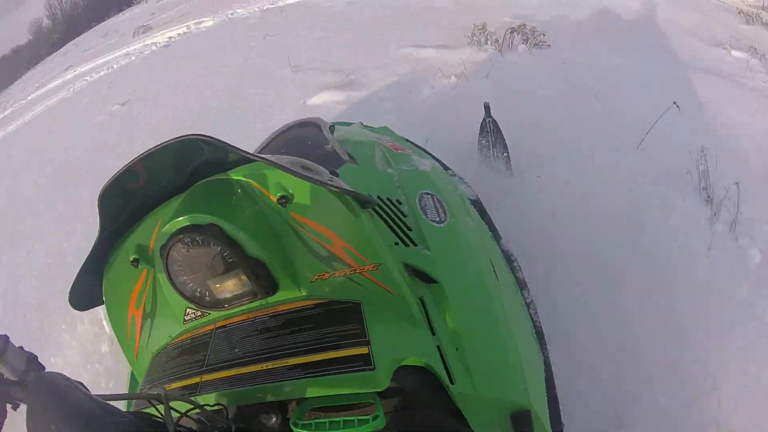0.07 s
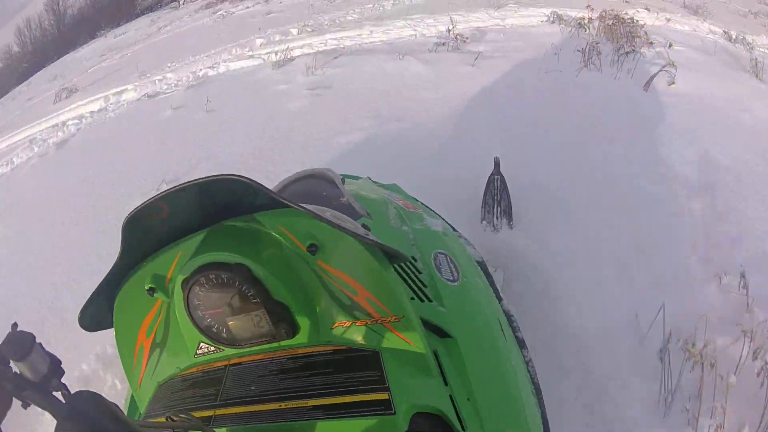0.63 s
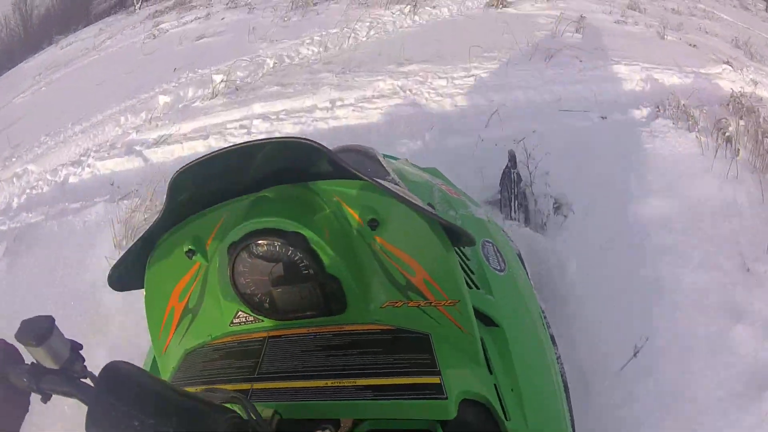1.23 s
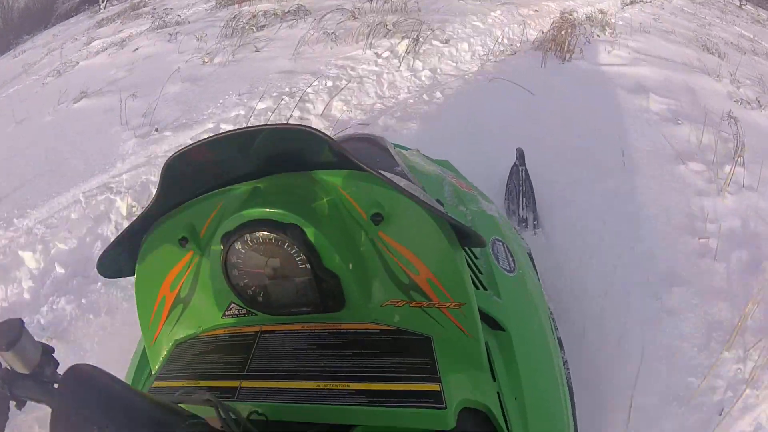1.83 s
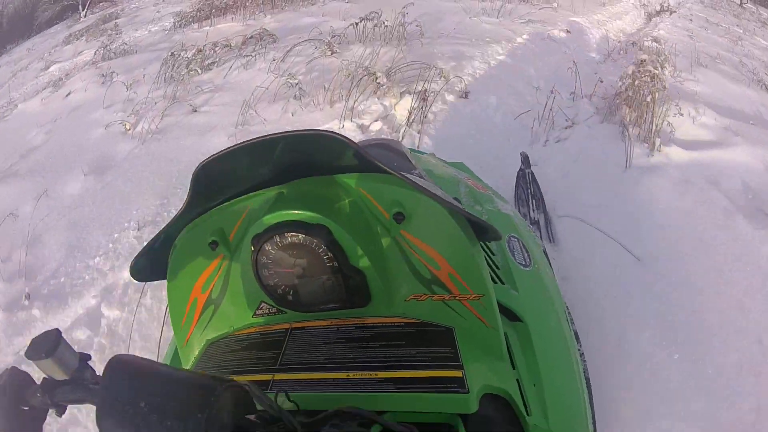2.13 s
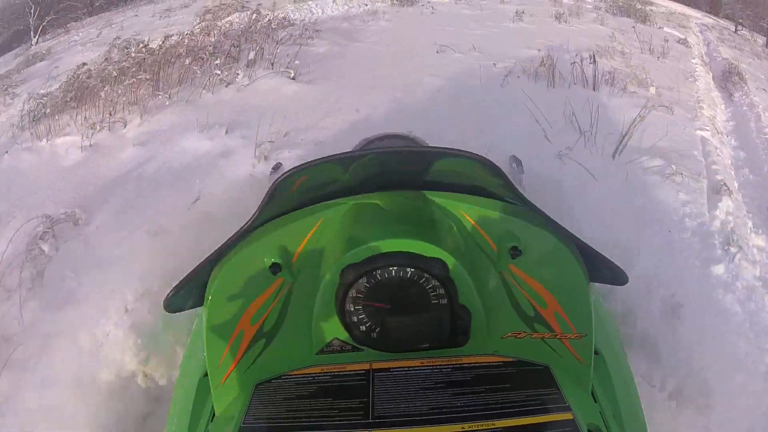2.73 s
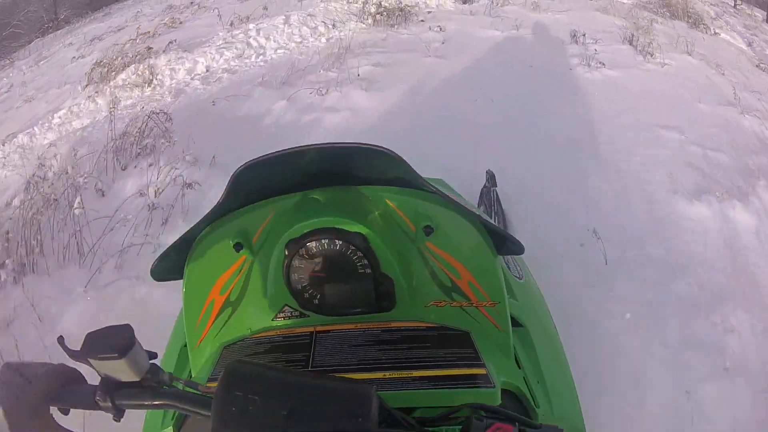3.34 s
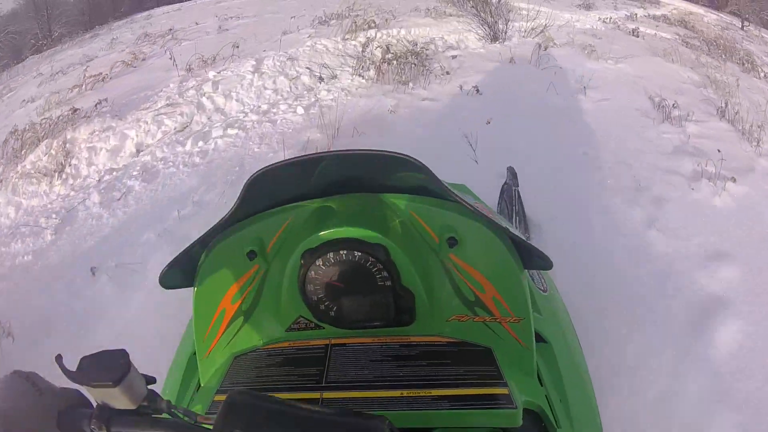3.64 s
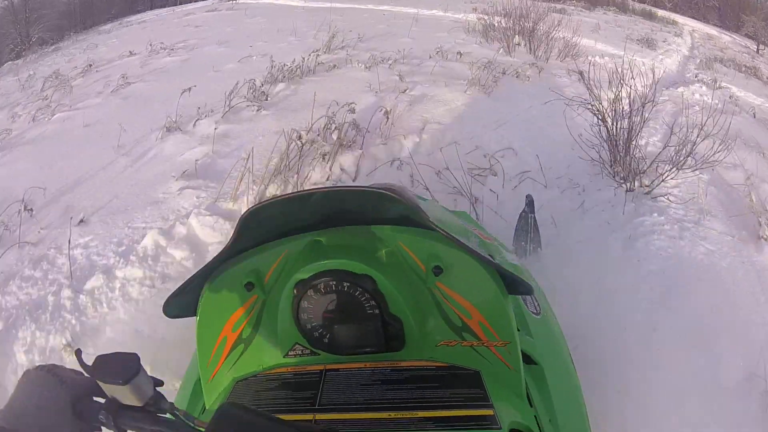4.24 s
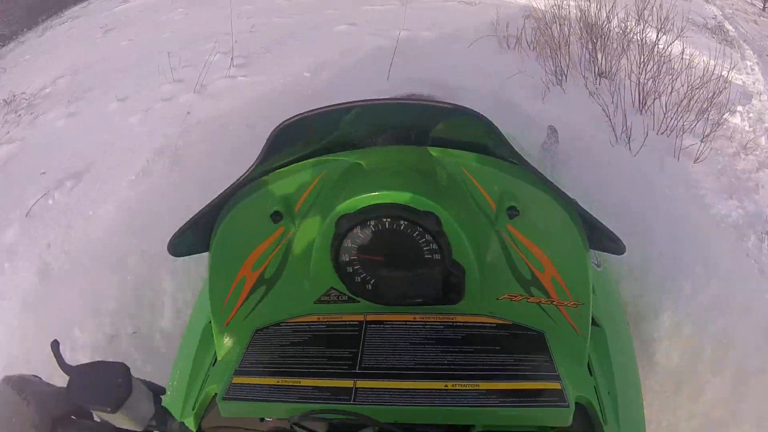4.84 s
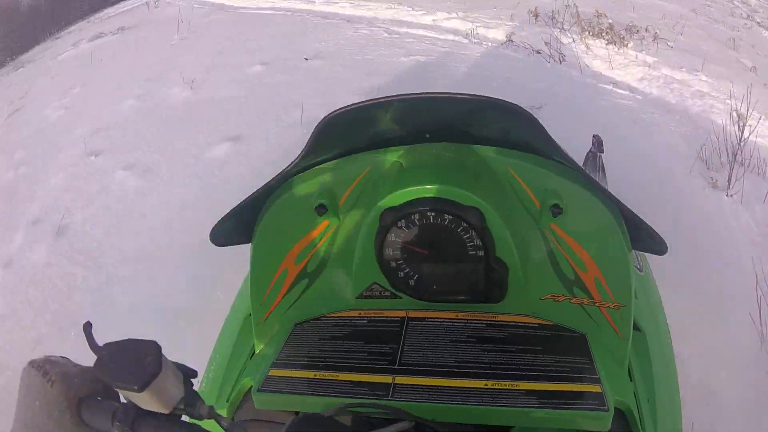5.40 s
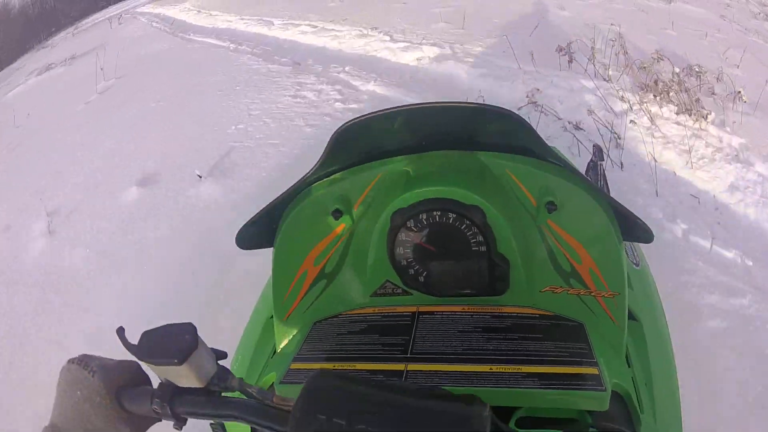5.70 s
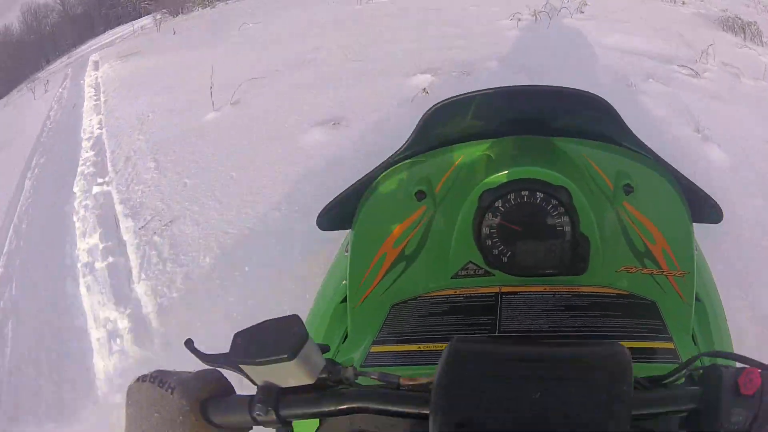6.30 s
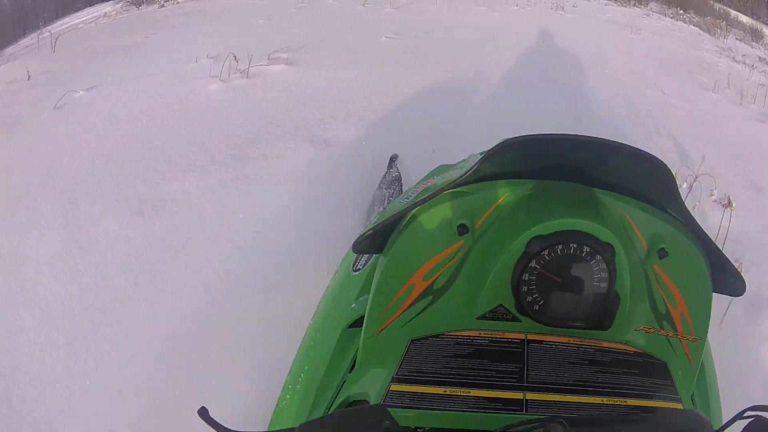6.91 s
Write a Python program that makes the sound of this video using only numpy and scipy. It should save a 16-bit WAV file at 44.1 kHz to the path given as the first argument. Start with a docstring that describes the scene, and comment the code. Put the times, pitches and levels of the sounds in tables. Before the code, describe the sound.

Close to the rider, a snowmobile engine drones with a rattling, metallic buzz as it crosses a snowy field. After a steadier opening, the revs climb and drop again and again, getting louder and brighter with each squeeze of the throttle. Beneath it are the low rumble of the track and a few dull bumps, while snow and dry stalks now and then hiss and tick against the hood.

```python
"""An engine hums and clatters, rising and easing with the throttle: a four-stroke twin snowmobile
in fresh snow, heard from the rider's helmet. Exhaust pulses hum through muffler and pipe, the intake
honks under steady load, knocks ring in the hood and a loose panel buzzes, all over the track's drone.
Thrown snow and dry stalks patter on the cowl, the chassis thumps over a few bumps,
and the engine whines briefly on two high orders."""
import sys
import numpy as np
from scipy import signal
from scipy.fft import rfft, irfft
from scipy.io import wavfile
from scipy.ndimage import uniform_filter1d

SR = 44100
rng = np.random.default_rng(int(sys.argv[2]) if len(sys.argv) > 2 else 0)


def to_wav(s):
    """Save 16-bit WAV."""
    ch = np.atleast_2d(s).T  # columns
    pcm = np.round(np.clip(ch, -1, 1) * 32767)  # PCM
    wavfile.write(sys.argv[1], SR, pcm.astype(np.int16))


N = 306936
TIME = np.arange(N) / SR
FREQS = np.fft.rfftfreq(N, 1 / SR)
CUTOFF_HZ = 15400

# Engine speed. Each row: time in seconds, firing rate in Hz.
FIRING_RATE = [(0.0, 133.1), (0.584, 145.2), (0.822, 154.1), (1.146, 152.9), (1.409, 146.1), (1.692, 154.4),
               (1.918, 148.2), (2.49, 158.2), (2.717, 168.5), (3.118, 150.8), (3.321, 162.1),
               (3.602, 187.7), (3.831, 149.7), (3.929, 146.7), (4.39, 172.3), (4.557, 154.7), (4.687, 147),
               (5.074, 161.5), (5.288, 185.7), (5.37, 189.2), (5.566, 169.2), (5.789, 182.8),
               (6.015, 168.7), (6.249, 188.5), (6.427, 145), (6.551, 150.2), (6.777, 184.2), (6.96, 148.2)]
# Muffler output for the two lowest orders. Each row: frequency in Hz, level in dB.
MUFFLER_RESPONSE = [(134, -51.5), (146, -51), (155, -46.5), (166, -56), (177, -45), (187, -45),
                    (268, -42.5), (290, -34.5), (306, -37.5), (326, -35), (351, -40), (362, -42),
                    (372, -49.5)]
# Other exhaust orders; unequal cylinders give the halves. Each row: firing-rate multiple, level in dB.
EXHAUST_ORDERS = [(.5, -60), (1.5, -64), (2.5, -63.5), (3, -49.5), (3.5, -66), (4, -50), (4.5, -75.5),
                  (5, -51.5), (5.5, -75), (6, -49), (6.5, -74), (7, -46.5), (7.5, -55.5), (8, -53.5)]
# Standing waves in the pipe. Each row: centre in Hz, width in Hz, gain in dB.
PIPE_MODES = [(370, 120, 6), (465, 45, -9.5), (505, 30, -1), (551, 61, -3), (658, 91, 3), (740, 180, 0.5),
              (1003, 250, -10), (1230, 220, 1.5)]
# Intake partials. Each row: firing-rate multiple, relative level in dB.
INTAKE_ORDERS = [(6, -5), (7, -8), (8, -7), (9, 6.5), (14, -5), (18, -2)]
# Intake honks at steady throttle. Each row: start in seconds, length in seconds, level in dB.
HONK_SPELLS = [(.6, 0.33, -44.5), (.9, 0.38, -40.5), (1.52, 0.93, -40), (5.25, 0.949, -53.5)]
# Airbox ringing. Each row: centre in Hz, width in Hz, gain in dB.
AIRBOX_MODES = [(2780, 120, 9.5), (3245, 450, -1.5), (3750, 700, 3.5)]
# Throttle squeezes. Each row: start in seconds, length in seconds, opening in dB re wide open.
THROTTLE_SPELLS = [(.24, 0.61, -13), (1.53, 0.16, -17), (2.44, 0.36, -2.5), (3.16, 0.32, 0),
                   (3.97, .33, -1.5), (4.75, 0.29, -5), (5.03, .22, -1), (5.58, .22, -2), (6.05, 0.12, -2),
                   (6.55, 0.21, -4.5)]
# Hood transmission. Each row: frequency in Hz, gain in dB.
HOOD_RESPONSE = [(300, -72), (700, -23), (1000, -26), (1200, -14.5), (1400, -4.5), (1700, -2), (2100, 0),
                 (2600, -2), (3000, -5.5), (4700, -13.5), (5500, -19.5), (7500, -31.5), (10500, -43.5),
                 (15000, -58)]
# Hood resonances and dips. Each row: centre in Hz, width in Hz, gain in dB.
HOOD_MODES = [(1845, 207, -12), (2480, 45, 2), (2860, 20, -0.5), (3290, 260, -5.5), (3663, 100, 6),
              (5340, 540, -8), (8300, 400, -3), (8800, 600, 6), (11740, 470, 7.5)]
# Low, middle and bright clatter. Each row: cruise level in dB, dB per Hz of firing rate,
# wide-open gain in dB, overrun gain in dB, flicker in dB, flicker rate in Hz.
CLATTER_BANDS = [(-33, 0.1226, -0.2, -1.7, 0.44, 50), (-29, 0.1187, 4.5, 0.44, 0.86, 29),
                 (-36, 0.1421, 1, -0.6, 1.12, 24)]
# Loose panel at low revs. Each row: start in seconds, length in seconds, level in dB.
CHATTER_SPELLS = [(.14, 0.21, -34.5), (.41, 0.063, -31), (.72, 0.11, -34)]
# Track speed. Each row: time in seconds, rate of lugs passing the drive wheel in Hz.
LUG_RATE = [(0, 87), (1.2, 85), (2.4, 96.6), (2.6, 126.1), (3.0, 99.5), (3.6, 148.8), (3.85, 106),
            (4.45, 120.1), (4.9, 93.8), (5.35, 148.8), (5.6, 112.7), (5.88, 141.2), (6.45, 114), (6.8, 137),
            (6.96, 120)]
# Chassis rumble. Each row: frequency in Hz, gain in dB.
CHASSIS_RESPONSE = [(20, -10), (55, -7), (100, -2.5), (180, 2.5), (235, -1.5), (290, 6.5), (380, 3.5),
                    (470, -11), (560, -2), (900, -19), (1500, -2.5), (4000, -27)]
# One grain's hit. Each row: frequency in Hz, gain in dB.
GRAIN_SPECTRUM = [(1000, -32), (3000, 17), (4200, 18.5), (5500, 5), (7000, 3), (9800, 3.5), (11200, -4.5),
                  (12400, -3), (13500, -8), (15500, -7)]
# Snow and stalks sweeping the cowl. Each row: centre in seconds, width in seconds, peak dB above 9 kHz.
COWL_SWEEPS = [(1.27, 0.065, -66), (2.53, .04, -64), (2.75, 0.069, -62), (2.95, 0.082, -57),
               (3.1, 0.079, -58), (4.5, 0.072, -53.5), (4.91, 0.078, -53), (5.19, 0.2, -45)]
# Stalks snapping. Each row: start in seconds, crack in dB above 9 kHz, decay in seconds, cowl ring in dB.
STALK_SNAPS = [(1.268, -57, 0.0035, -46), (1.341, -61, 0.0043, -29), (2.521, -44, 0.0083, -33),
               (2.731, -40, .004, -30), (2.742, -50, 0.0046, -38), (2.917, -40, 0.0017, -47),
               (2.956, -44, 0.0016, -42), (3.098, -38, 0.0026, -31), (3.118, -38, 0.0034, -25),
               (3.143, -43, 0.0018, -36), (4.494, -38, 0.0034, -32), (4.882, -50, 0.0017, -32.5),
               (4.997, -39, 0.0021, -44), (5.322, -32.5, 0.0028, -36)]
# Bumps under the skis. Each row: centre in seconds, width in seconds, level in dB.
SKI_BUMPS = [(2.121, .03, -43), (2.5, 0.027, -49), (3.79, .08, -45.5), (6.38, .032, -45),
             (6.904, 0.036, -42)]
# Brief engine whines. Each row: start in seconds, length in seconds, level in dB.
WHINE_SPELLS = [(2.5, 0.42, -35), (4.2, .16, -36), (4.76, 0.43, -36)]


def amp(db):
    """dB to gain."""
    return 10 ** (np.asarray(db) / 20)


def unit(x):
    """Scale to rms 1."""
    return x / np.sqrt(np.mean(x ** 2) + 1e-20)


def curve(rows):
    """Time table at every sample."""
    return np.interp(TIME, *np.transpose(rows))


def spells(rows, attack_s, release_s):
    """Gain of events that rise, hold and decay."""
    return sum(amp(db) * np.clip((TIME - start_s) / attack_s, 0, 1)
               * np.exp(-np.maximum(TIME - start_s - length_s, 0) / release_s)
               for start_s, length_s, db in rows)


def swells(rows):
    """Gain of Gaussian swells."""
    return sum(amp(db) * np.exp(-((TIME - centre_s) / width_s) ** 2) for centre_s, width_s, db in rows)


def shape(rows):
    """Spectrum table as a dB curve."""
    hz, db = np.transpose(rows)
    return np.interp(np.log(FREQS + 1), np.log(hz), db)


def bells(rows):
    """Resonances and dips as a dB curve."""
    return sum(db * np.exp(-(2 * (FREQS - hz) / width_hz) ** 2) for hz, width_hz, db in rows)


def colour(x, db):
    """Filter by a dB curve."""
    return irfft(rfft(x) * amp(db), N)


def band_rms(x, low_hz, high_hz):
    """Rms within a band."""
    return np.std(irfft(rfft(x) * ((FREQS > low_hz) & (FREQS < high_hz)), N)) + 1e-12


def wander(rate_hz, steps=4096):
    """Smooth random drift, rms 1."""
    hz = np.fft.rfftfreq(steps, TIME[-1] / steps)
    slow = unit(irfft(rfft(rng.standard_normal(steps)) * np.exp(-(hz / rate_hz) ** 2)))
    return np.interp(TIME, np.linspace(0, TIME[-1], steps), slow)


def partial(cycles, flutter, flutter_hz, offset_cycles=None):
    """Tone of rms near 1, fluttering in level and phase."""
    offset_cycles = rng.random() if offset_cycles is None else offset_cycles
    angle = 2 * np.pi * ((cycles + offset_cycles) % 1)
    in_phase = (1 + flutter * wander(flutter_hz)) * np.cos(angle)
    quadrature = flutter * wander(flutter_hz) * np.sin(angle)
    return np.sqrt(2) * (in_phase + quadrature)


def ring(x, t60_s):
    """Dense modes smear each hit with little colour."""
    t = TIME[:8192]
    modes = rfft(rng.standard_normal(len(t)) * amp(-60 * t / t60_s))
    return unit(signal.oaconvolve(x, irfft(modes / abs(modes) ** .6))[:N])


def ringing_noise(hz, width_hz):
    """Noise in one resonance, rms 1."""
    return unit(irfft(rfft(rng.standard_normal(N)) / (1 + ((FREQS - hz) / width_hz) ** 2) ** 2, N))


def firing_hz(inertia_s=0.0897):
    """Firing rate, smoothed by the flywheel."""
    return uniform_filter1d(curve(FIRING_RATE), size=round(inertia_s * SR), mode="nearest")


def throttle():
    """Throttle opening, 0 to 1."""
    return spells(THROTTLE_SPELLS, attack_s=0.045, release_s=0.053)


def pull(full_hz_per_s=50):
    """0 at steady revs, towards 1 as they climb."""
    return np.tanh(np.maximum(np.gradient(firing_hz()) * SR, 0) / full_hz_per_s)


def overrun(full_hz_per_s=130):
    """0 under pull, towards 1 as revs fall."""
    return np.clip(-np.gradient(firing_hz()) * SR / full_hz_per_s, 0, 1)


def slack(bite_hz=146, range_hz=1.8):
    """1 at low revs, 0 once the clutch bites."""
    return .5 - .5 * np.tanh((firing_hz() - bite_hz) / range_hz)


def muffler_db(hz):
    """Level the muffler leaves a low order."""
    return np.interp(hz, *np.transpose(MUFFLER_RESPONSE))


def exhaust(firings, upper_db=-1.14, slack_db=-6):
    """Muffled low orders throb and boom under load; the upper ones break up on overrun."""
    rate_hz, shut = firing_hz(), overrun()
    boom = amp(muffler_db(2 * rate_hz) + 2.5 * pull() - 6.5 * shut)
    boom *= partial(2 * firings, flutter=0.0091 + 0.097 * shut, flutter_hz=39.5)
    throb = amp(muffler_db(rate_hz) + 1.5 * throttle() - 3.5 * shut)
    throb *= partial(firings, flutter=0.093, flutter_hz=25)
    rough, dull = 0.11 + 0.23 * shut, amp(slack_db * slack())
    waver_db = np.interp(rate_hz, [152, 175], [.8, 3.5])
    puffs = np.zeros(N)
    # Aligned phases make one puff a firing, slightly smeared by the pipe.
    for order, db in EXHAUST_ORDERS:
        gain = amp(db + waver_db * wander(rate_hz=8.6)) * (dull if order > 4 else 1)
        puffs += gain * partial(order * firings, rough, flutter_hz=9.1, offset_cycles=0.017 * order ** 2)
    return boom + throb + amp(upper_db - 5.5 * shut) * colour(puffs, bells(PIPE_MODES))


def intake(firings, buzz_db=3, buzz_hz=3300, buzz_width_hz=900, steady_db=-52, slack_db=-20):
    """The airbox honks on a few orders, with a metallic buzz of high orders above."""
    honk = sum(amp(db) * partial(order * firings, flutter=.015 * order, flutter_hz=25)
               for order, db in INTAKE_ORDERS)
    rate_hz = firing_hz()
    buzz = sum(np.exp(-((order * rate_hz - buzz_hz) / buzz_width_hz) ** 2)
               * partial(order * firings, flutter=.35, flutter_hz=9) for order in range(16, 29))
    buzz = unit(colour(buzz, bells(HOOD_MODES) + bells(AIRBOX_MODES)))
    floor = amp(steady_db + slack_db * slack())
    gain = np.hypot(spells(HONK_SPELLS, attack_s=0.095, release_s=0.076), floor)
    return gain * (honk + amp(buzz_db) * buzz)


def knocks(cycles, jitter_s, uneven=0, spread_db=0):
    """One impulse a cycle, slightly early or late; uneven alternates strong and weak."""
    count = np.arange(1, int(cycles[-1]))
    late, size = rng.standard_normal((len(count), 2)).T
    position = np.clip((np.interp(count, cycles, TIME) + jitter_s * late) * SR, 0, N - 2)
    gain = (1 + uneven * (-1) ** count) * amp(spread_db * size)
    sample, fraction = position.astype(int), position % 1
    return unit(np.bincount(sample, gain * (1 - fraction), N) + np.bincount(sample + 1, gain * fraction, N))


def clatter(firings, valve_db=1, rasp_db=4, cruise_hz=162.5):
    """Firing knocks, valve taps once a cam turn and belt and clutch rasp, all through the hood."""
    rasp = unit(rng.standard_normal(N) * (1 + 0.11 * np.cos(np.pi * firings)))
    valves = ring(knocks(firings / 2, jitter_s=35e-6), t60_s=0.15)
    cylinders = ring(knocks(firings, jitter_s=30e-6, uneven=0.19, spread_db=0.7), t60_s=0.17)
    inside = cylinders + amp(valve_db) * valves + amp(rasp_db) * rasp
    outside = colour(inside, shape(HOOD_RESPONSE) + bells(HOOD_MODES))
    lowpass = 1 / (1 + (FREQS / 1870) ** 24)
    highpass = 1 - 1 / (1 + (FREQS / 3250) ** 24)
    low = irfft(rfft(outside) * lowpass, N) / band_rms(outside, 1430, 1850)
    middle = irfft(rfft(outside) * (1 - lowpass - highpass), N) / band_rms(outside, 1900, 3200)
    bright = irfft(rfft(outside) * highpass, N) / band_rms(outside, 3300, 5000)
    excess_hz, load, shut = firing_hz() - cruise_hz, throttle(), overrun()
    sound = np.zeros(N)
    for band, row in zip((low, middle, bright), CLATTER_BANDS):
        cruise_db, db_per_hz, open_db, overrun_db, flicker_db, flicker_hz = row
        level_db = cruise_db + db_per_hz * excess_hz + open_db * load + overrun_db * shut
        sound += band * amp(level_db + flicker_db * wander(flicker_hz))
    return sound


def panel_chatter(firings, uneven_db=4.5, steady_db=-42):
    """A loose panel buzzes on every other firing."""
    bursts = (1 + np.cos(np.pi * firings)) ** 2 * amp(uneven_db * wander(rate_hz=50))
    gain = np.hypot(spells(CHATTER_SPELLS, attack_s=0.019, release_s=0.037), amp(steady_db))
    return gain * unit(bursts * ringing_noise(hz=2325, width_hz=75))


def track(usual_hz=115, drone_db=-55, drone_db_per_hz=0.2737, rumble_db=-49, rumble_db_per_hz=0.02):
    """Lugs drone and the chassis rumbles, both louder with ground speed."""
    lug_hz = curve(LUG_RATE)
    drone = amp(drone_db + drone_db_per_hz * (lug_hz - usual_hz))
    drone *= partial(np.cumsum(lug_hz) / SR, flutter=0.13, flutter_hz=16)
    rumble = amp(rumble_db + rumble_db_per_hz * (lug_hz - usual_hz) + 1.2 * wander(rate_hz=10))
    rumble *= unit(colour(rng.standard_normal(N), shape(CHASSIS_RESPONSE)))
    return drone + rumble


def spray(grains_per_s=2600, patches=6, spread_db=4, powder=0.5, ring_s=0.0091, steady_db=-70):
    """Snow grains patter on the cowl over a powder hiss; dry stalks snap and make it ring."""
    sizes = amp(spread_db * np.minimum(rng.exponential(1, N), 3.5)) * rng.choice([-1, 1], N)
    # Each cowl patch has its own colour.
    chance = grains_per_s / patches / SR
    patter = unit(sum(ring(sizes * (rng.random(N) < chance), t60_s=.004) for _ in range(patches)))
    crack_gain, ring_gain = np.zeros((2, N))
    for start_s, crack_db, decay_s, ring_db in STALK_SNAPS:
        after = TIME >= start_s
        age_s = TIME[after] - start_s
        crack_gain[after] += amp(crack_db) * np.exp(-age_s / decay_s)
        ring_gain[after] += amp(ring_db) * np.exp(-age_s / ring_s)
    clumps = amp(1.5 * wander(rate_hz=70))
    snow_gain = amp(steady_db) + swells(COWL_SWEEPS) * clumps
    snow = snow_gain * unit(patter + powder * rng.standard_normal(N))
    cracks = crack_gain * rng.standard_normal(N)
    grain_db = shape(GRAIN_SPECTRUM)
    treble_rms = np.sqrt(np.mean(amp(grain_db) ** 2 * ((FREQS > 9000) & (FREQS < CUTOFF_HZ))))
    cowl = ring_gain * ringing_noise(hz=3940, width_hz=580)
    return colour(snow + cracks, grain_db) / treble_rms + cowl


def bumps():
    """The chassis thumps as the skis cross bumps."""
    thump_db = shape([(30, -8), (110, 4), (300, 9), (480, -8), (1200, -46.5)])
    return swells(SKI_BUMPS) * unit(colour(rng.standard_normal(N), thump_db))


def engine_whine(firings, upper_db=-6):
    """The engine whines briefly on its tenth and thirteenth orders."""
    tenth = partial(10 * firings, flutter=0.36, flutter_hz=25)
    thirteenth = partial(13 * firings, flutter=.6, flutter_hz=12)
    return spells(WHINE_SPELLS, attack_s=.09, release_s=0.067) * (tenth + amp(upper_db) * thirteenth)


def scene():
    """Mono mix; one crankshaft drives all engine layers."""
    firings = np.cumsum(firing_hz() * (1 + 0.001434 * wander(rate_hz=16.3))) / SR
    tones = exhaust(firings) + intake(firings) + engine_whine(firings)
    rattles = clatter(firings) + panel_chatter(firings)
    return (tones + rattles + track() + bumps() + spray())[None]


def record(dry):
    """Steep low-pass."""
    lowpass = signal.firwin(511, CUTOFF_HZ, window=("kaiser", 9), fs=SR)
    return signal.oaconvolve(dry, lowpass[None], "same")


dry = scene()
out = record(dry)
to_wav(out)
```